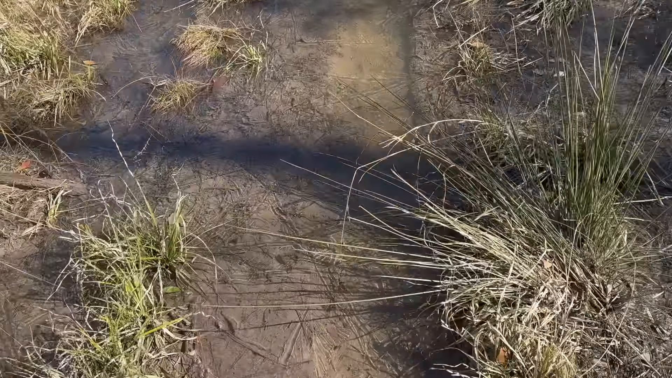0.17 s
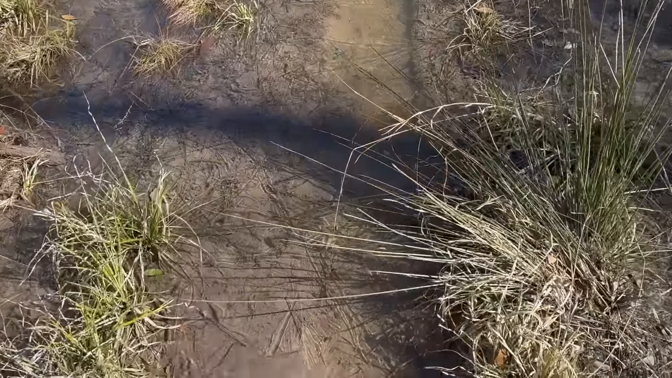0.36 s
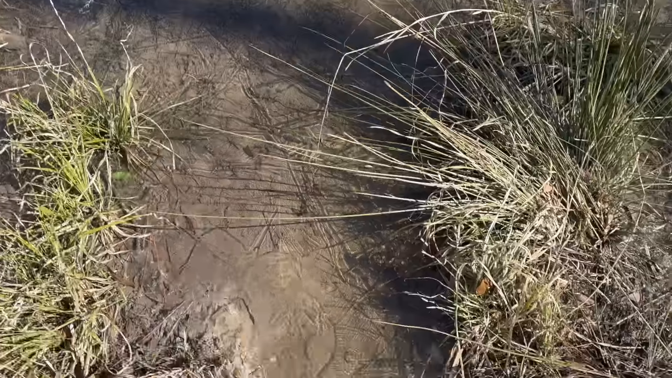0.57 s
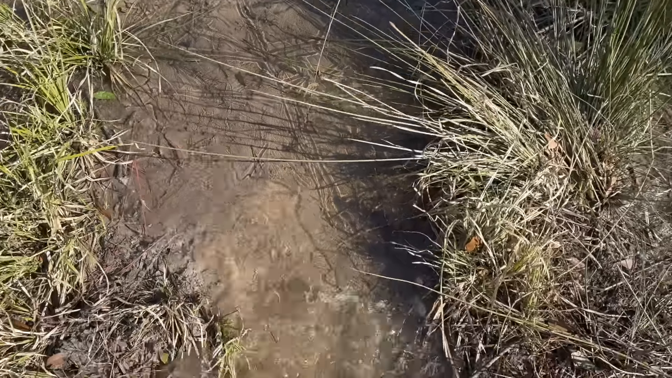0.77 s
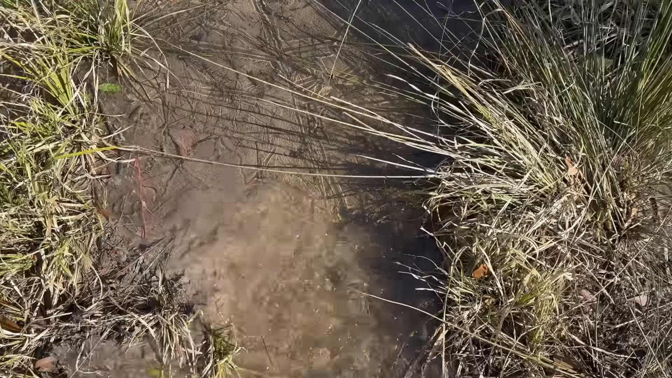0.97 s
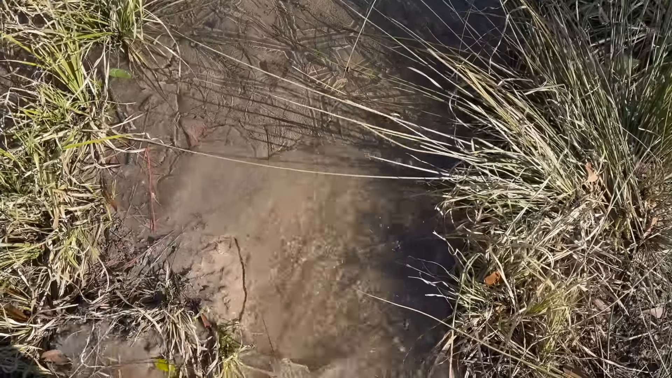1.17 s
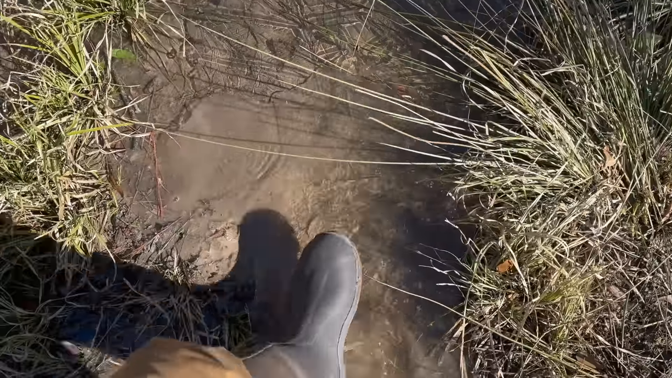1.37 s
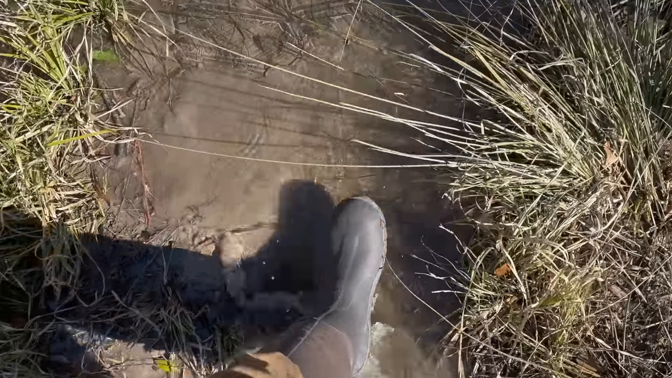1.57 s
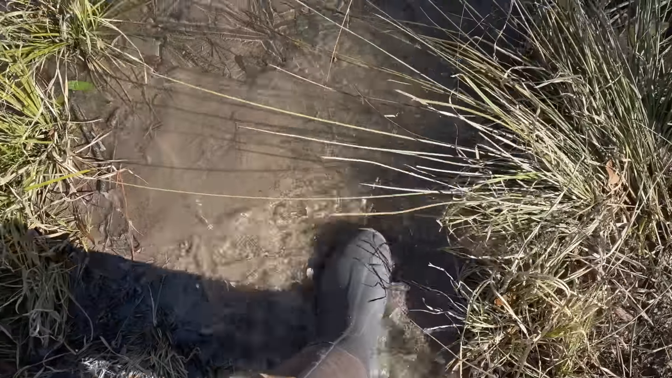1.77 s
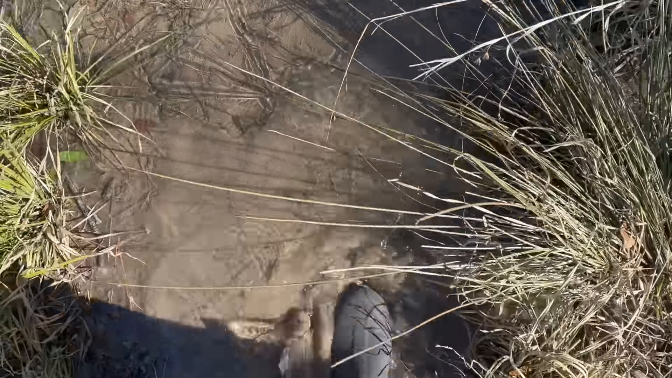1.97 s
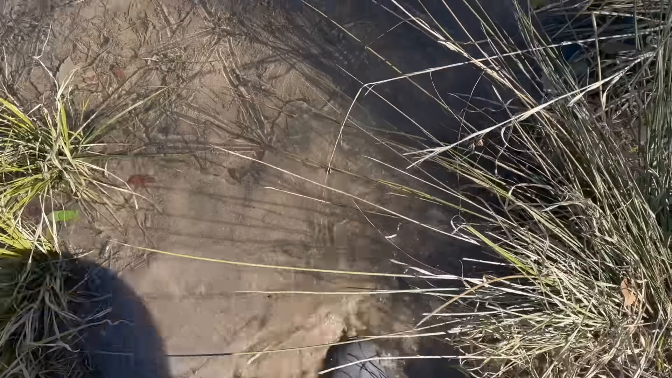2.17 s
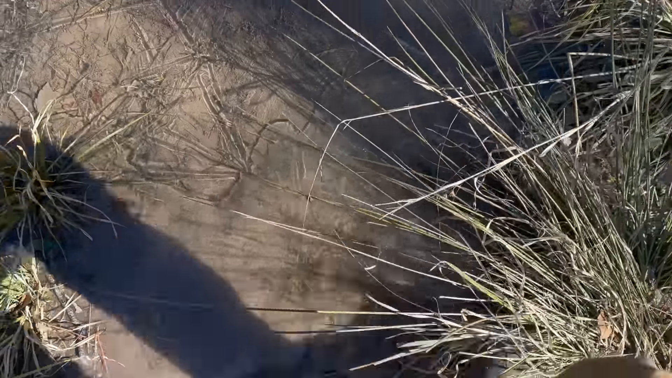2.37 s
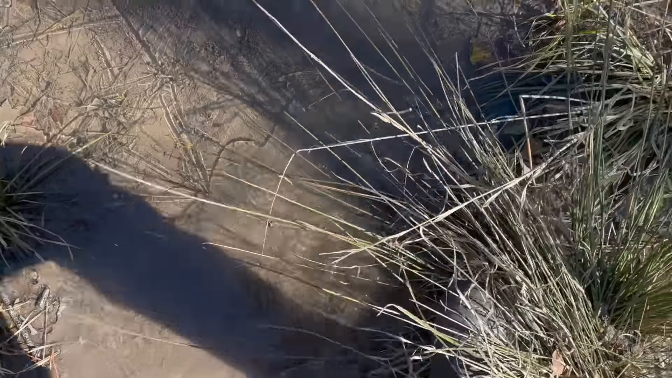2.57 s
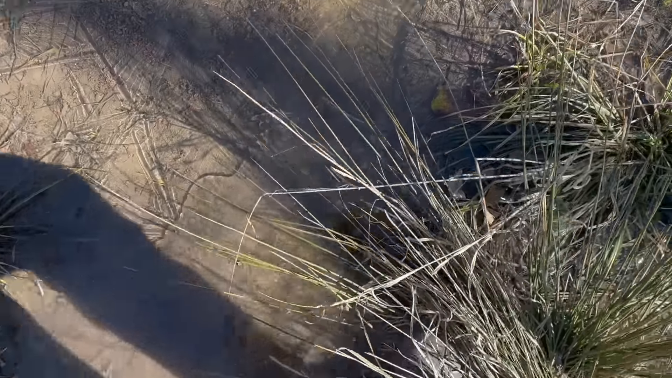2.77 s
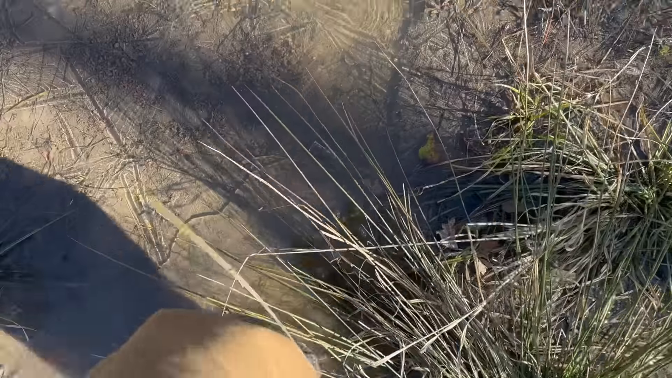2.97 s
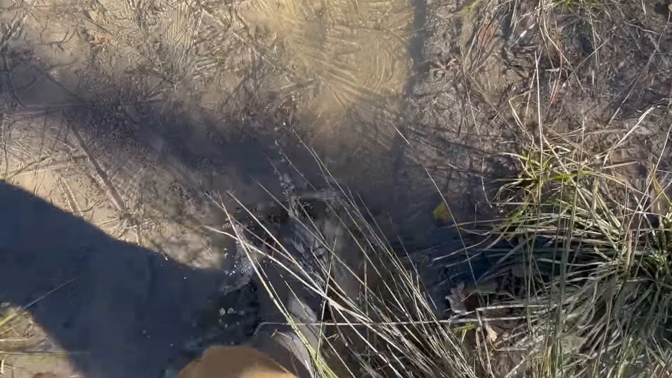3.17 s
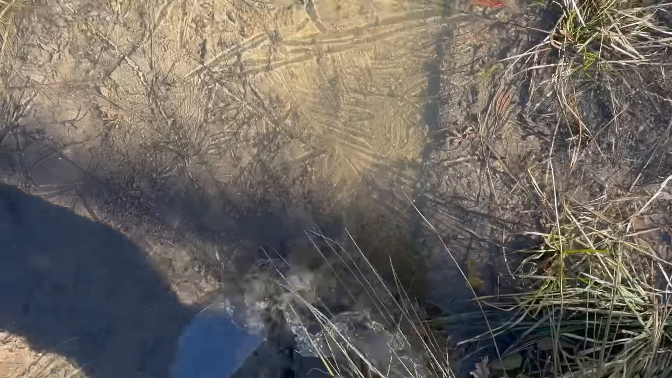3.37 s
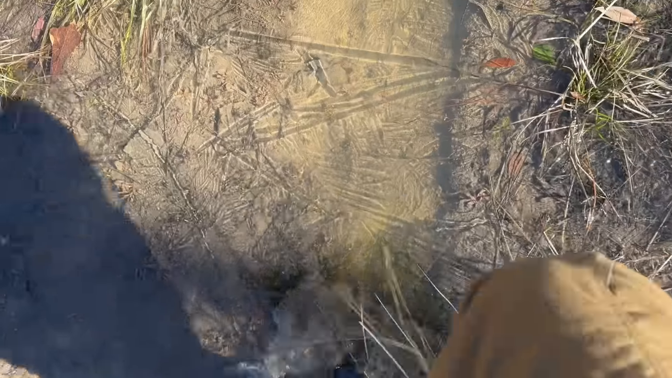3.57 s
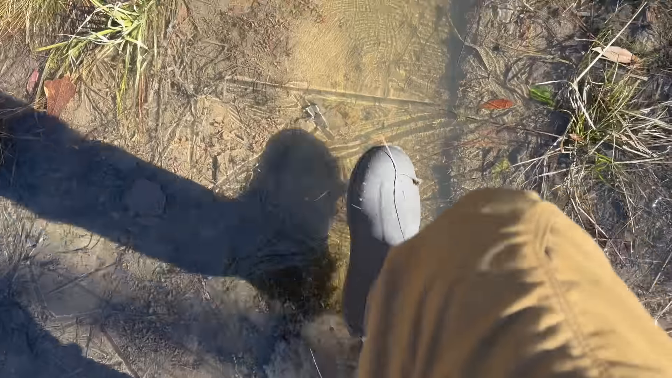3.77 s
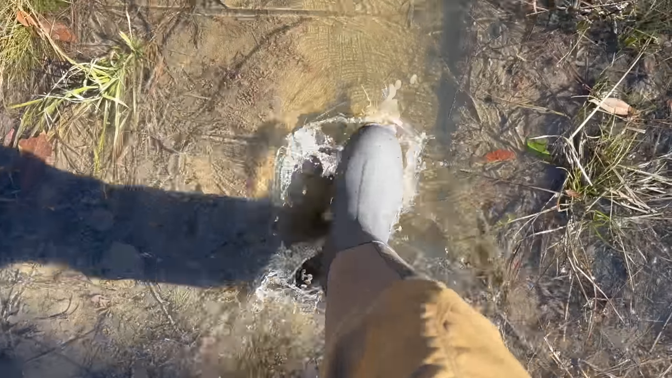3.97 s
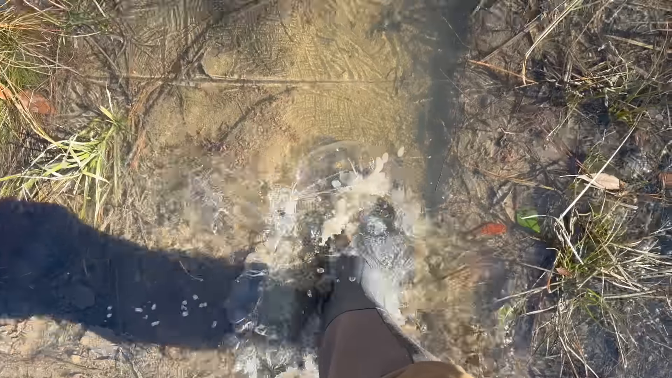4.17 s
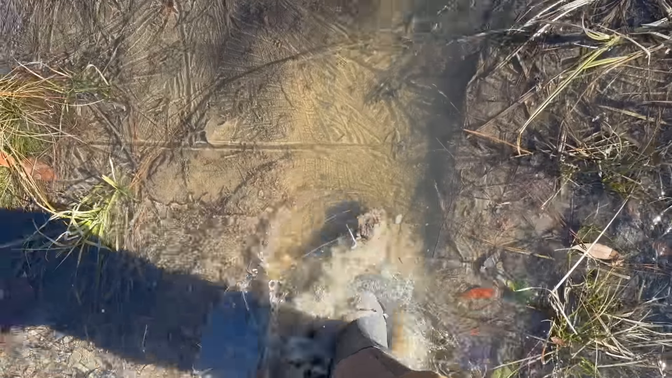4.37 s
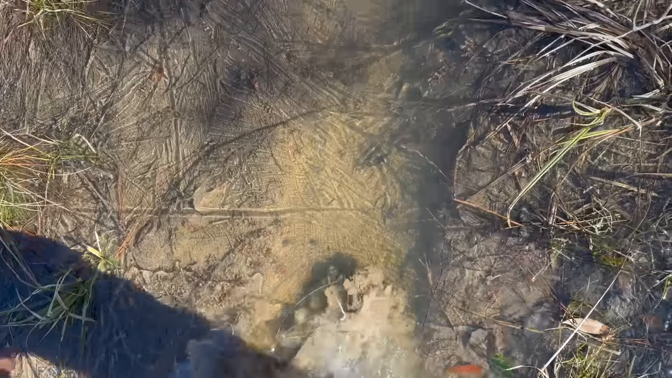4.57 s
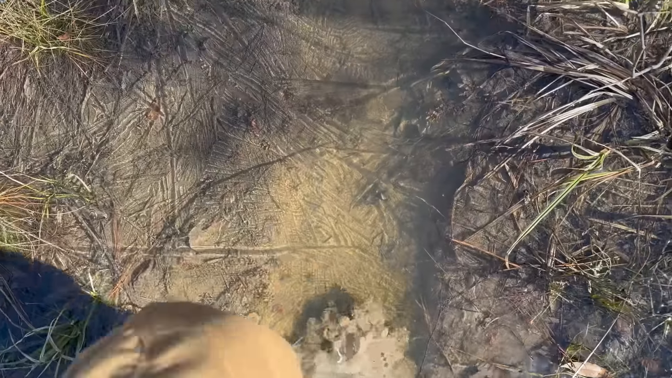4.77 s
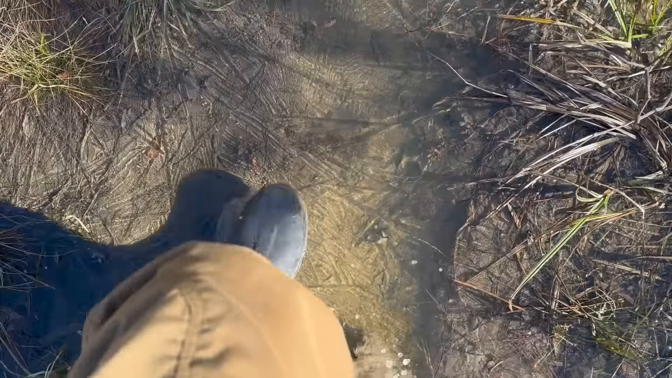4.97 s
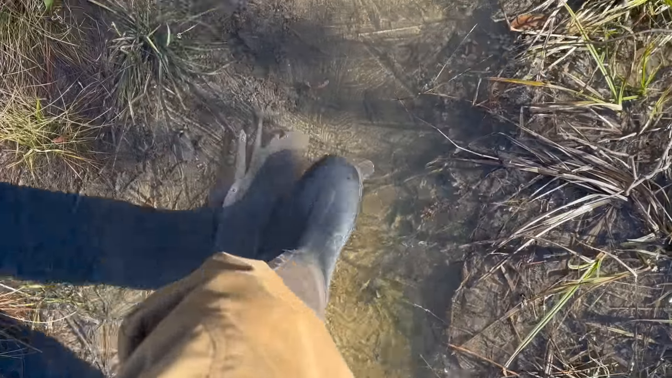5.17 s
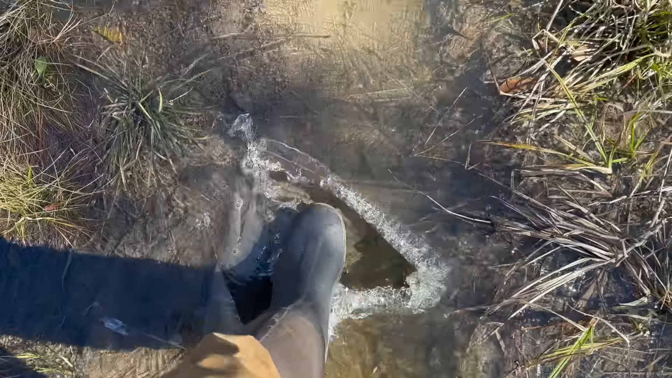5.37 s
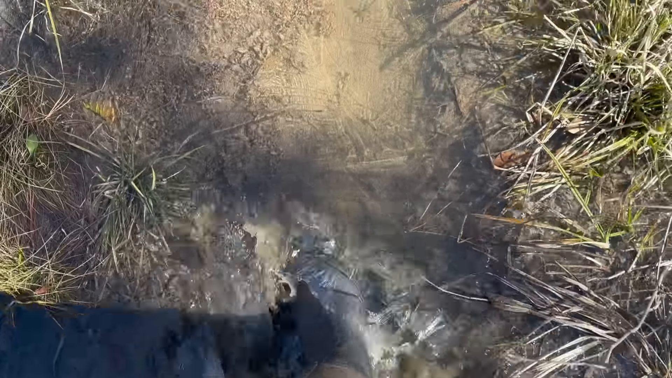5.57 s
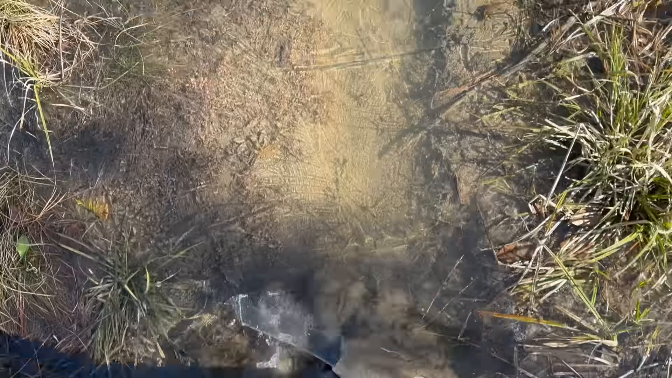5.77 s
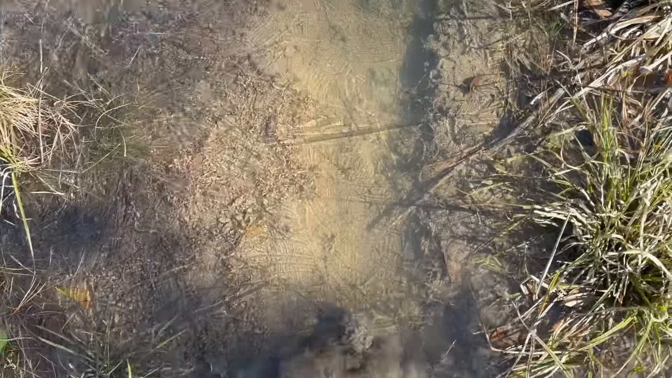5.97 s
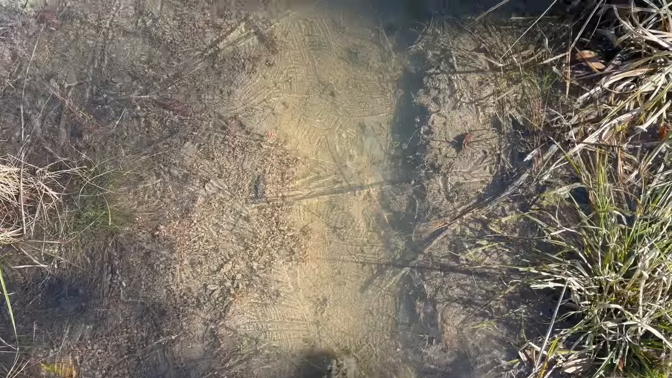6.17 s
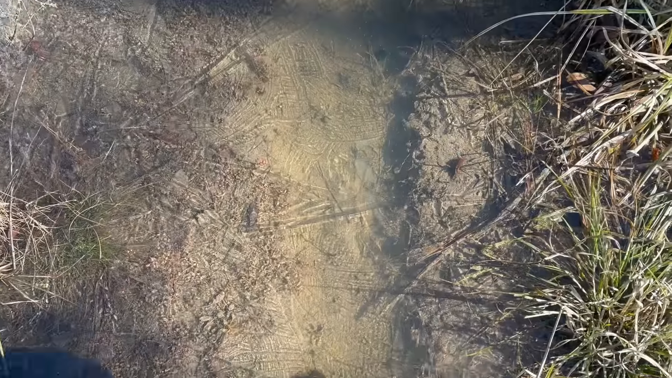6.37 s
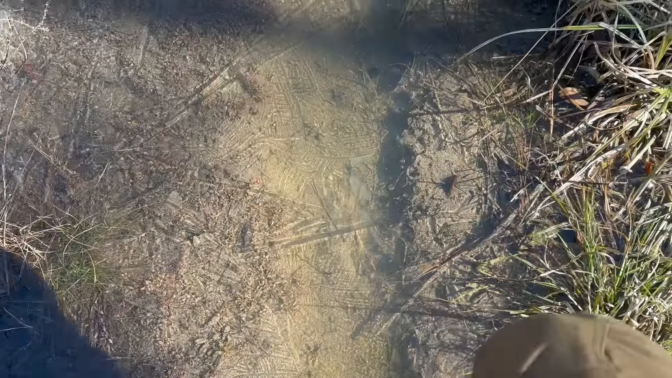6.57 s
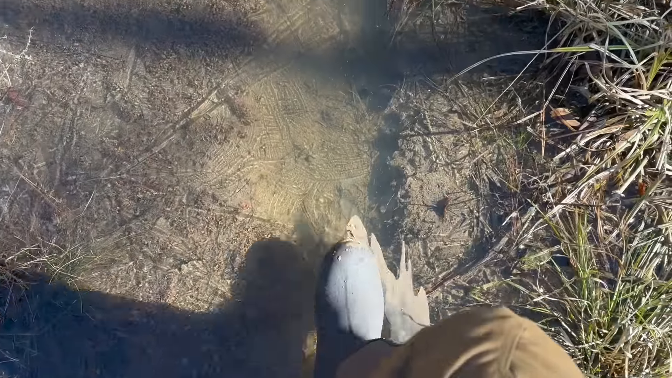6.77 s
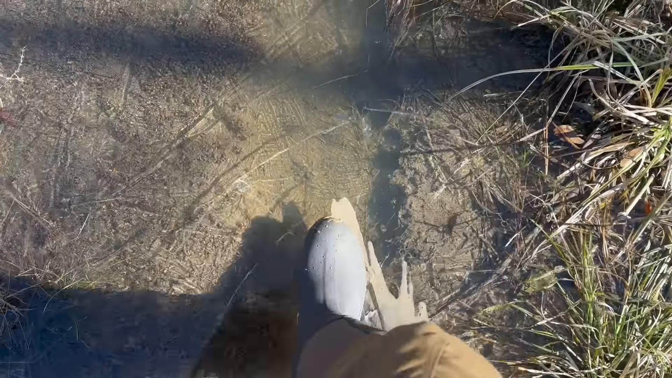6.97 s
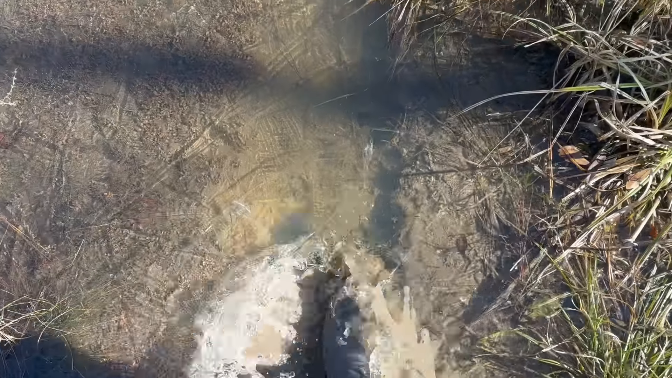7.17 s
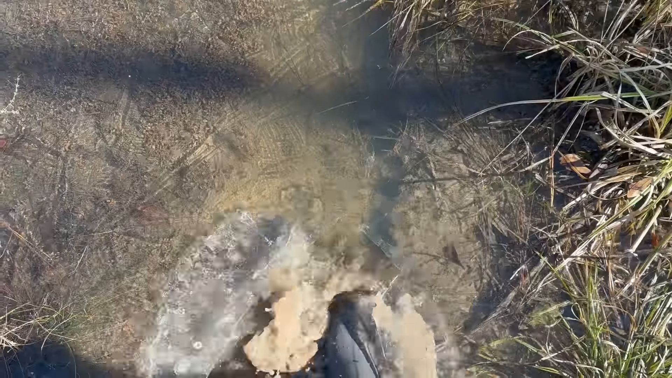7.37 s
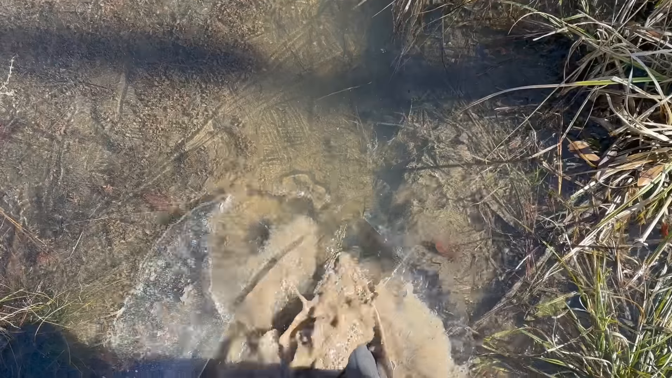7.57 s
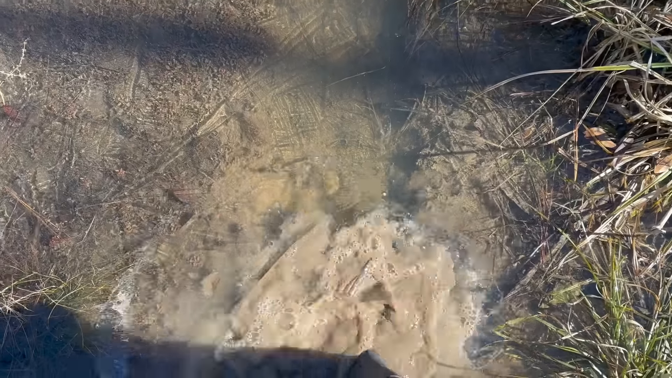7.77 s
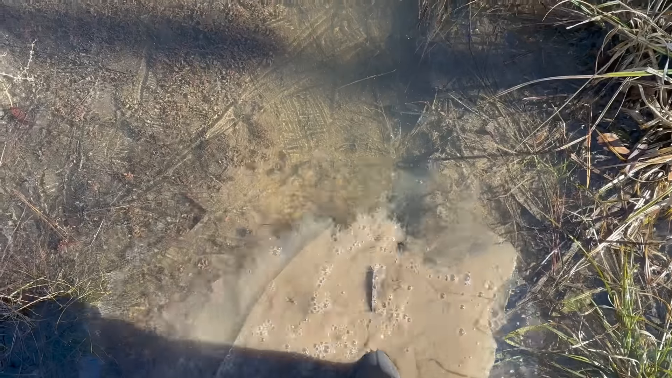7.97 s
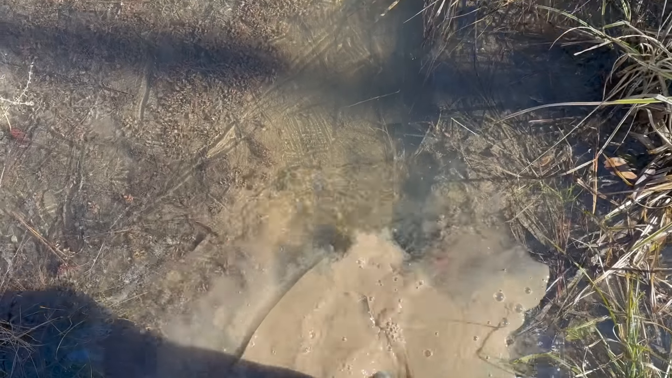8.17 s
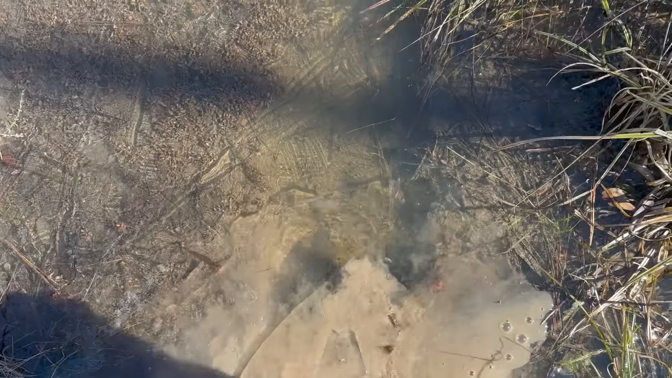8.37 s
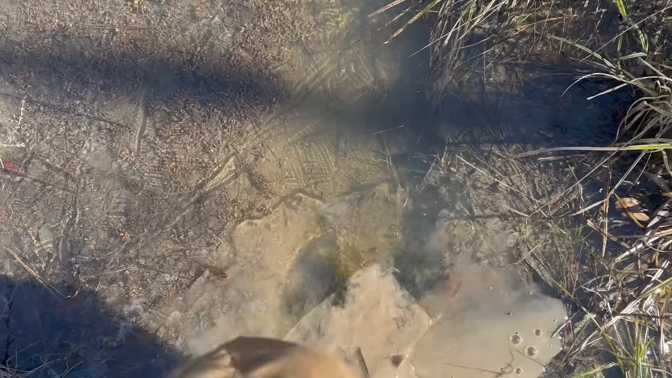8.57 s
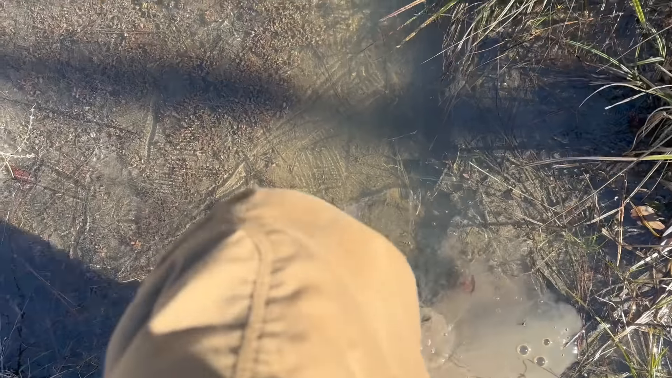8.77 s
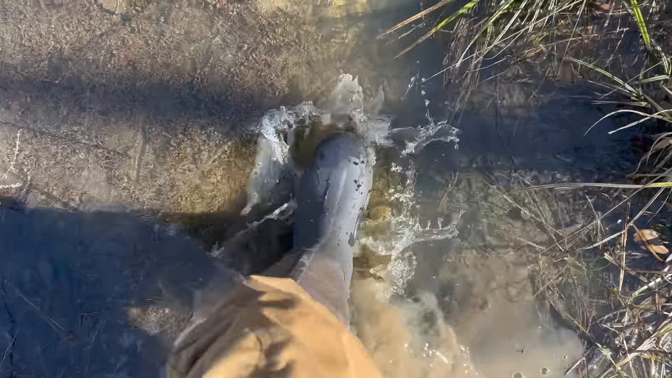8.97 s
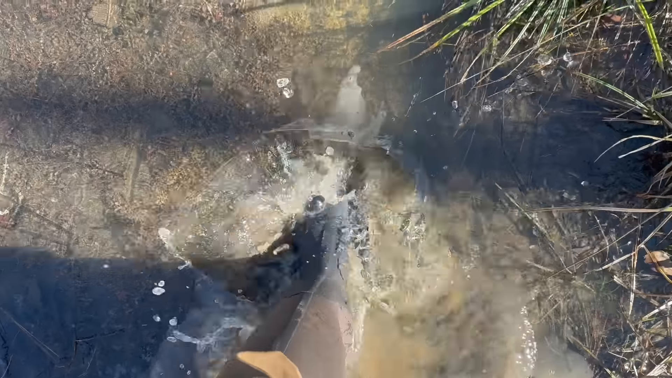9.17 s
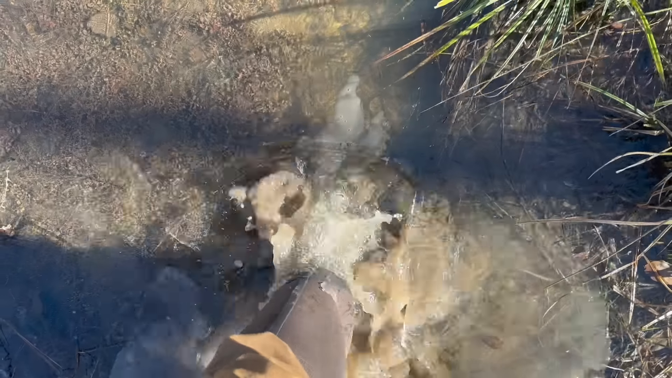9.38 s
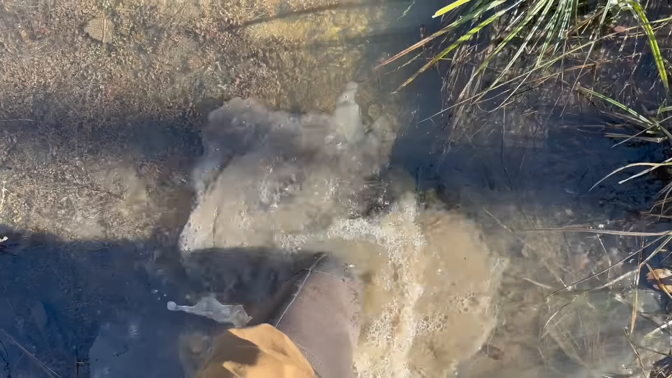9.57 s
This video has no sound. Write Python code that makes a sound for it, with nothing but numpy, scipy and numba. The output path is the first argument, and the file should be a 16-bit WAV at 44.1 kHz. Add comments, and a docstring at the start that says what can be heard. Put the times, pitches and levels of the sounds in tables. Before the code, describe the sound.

Close to a hand-held phone pointing down, rubber boots push through shallow water at an uneven walking pace. Each step brings a wet slap, a bubbling slosh and a dull thud in the mud, then trails off into drips. Low wind rumbles on the microphone at the start and around the middle. After a brief lull, one more strong splash comes near the end. A faint distant engine and soft outdoor hiss lie behind.

```python
"""A slap of water and a low gust of wind, then rubber boots wading through shallow muddy water.
Each push of a boot swells and fades, churning up bubbles, gurgles and spray; the sole thumps on the mud.
Air trapped in the water rings briefly, making the slaps and plops. Wind buffets the two microphones
of a hand-held phone that points down, and a far engine drones over a soft open-air hiss."""
import sys
import numpy as np
from scipy import signal
from scipy.fft import rfft, irfft, next_fast_len
from scipy.io import wavfile
from scipy.ndimage import uniform_filter1d
from numba import njit

SR = 44100
rng = np.random.default_rng(int(sys.argv[2]) if len(sys.argv) > 2 else 0)


def wrap_up_sound(samples):
    """Save the sound to the file named by the first command line argument, as 16-bit audio."""
    columns = np.atleast_2d(samples).T
    # keep every value between -1 and 1, then stretch to whole-number steps
    tamed = np.clip(columns, -1, 1)
    steps = np.round(tamed * 32767).astype(np.int16)
    wavfile.write(sys.argv[1], SR, steps)


N = 423801

SLOSH_HZ, SPRAY_HZ, GURGLE_HZ = (444.7, 2864), (2910, 16900), (140, 477)  # lowest and highest pitch
# Pushes of a boot through the water:
# (peak time [s], slosh level [dB], spray level [dB], gurgle level [dB], rise time [s], fade [dB/s])
BOOT_PUSHES = [(0.0, -43, -45, -43, .01, 50), (0.457, -32.5, -33.5, -32, 0.014, 49),
               (0.524, -43, -25, -48, 0.099, 270), (0.599, -27, -36, -31, 0.024, 58.5),
               (0.786, -30.5, -41, -29.5, 0.33, 106), (0.967, -29.5, -41.5, -53, 0.19, 180),
               (1.366, -30, -43, -41, 0.013, 107), (1.436, -29, -34, -31, 0.092, 306),
               (1.525, -29, -31, -35.5, 0.048, 249), (1.617, -21, -24.5, -37, 0.018, 261),
               (1.702, -40, -45, -43.5, 0.033, 17), (2.402, -40, -29, -39, 0.17, 156),
               (2.441, -31, -31, -46, 0.063, 320), (2.78, -43, -48, -45.5, 1, 27),
               (3.07, -30.5, -32.5, -32, 0.046, 36.5), (3.189, -26.5, -43, -32, 0.43, 67.5),
               (3.806, -29, -32, -32, 0.012, 43), (3.95, -19.5, -29.5, -25.5, 0.14, 163),
               (4.049, -32.5, -41, -29, 0.13, 26.5), (4.593, -32, -45, -27, 0.39, 55),
               (4.726, -24.5, -37.5, -24, 0.011, 211), (4.98, -30.5, -37, -28, 0.061, 140),
               (5.171, -29.5, -25.5, -33, 0.12, 56), (5.542, -34.5, -39, -25, 0.12, 52),
               (5.688, -30.5, -38, -37.5, 1, 37.5), (6.318, -43.5, -52, -46, 1, 30.5),
               (6.769, -30, -27.5, -36.5, 0.023, 286), (6.896, -28, -22.5, -35, 0.076, 125),
               (7.076, -23.5, -32, -27, 0.3, 33), (8.396, -38, -51.5, -32.5, 0.22, 9),
               (8.831, -29.5, -33, -27.5, 0.027, 130), (8.89, -23, -28.5, -29.5, 0.015, 31.5),
               (9.184, -26, -37.5, -22, 0.46, 245)]


def wading():
    """A boot churns the water: clouds of bubbles and drops grow louder and softer with each push."""
    slosh_db, spray_db, gurgle_db = map(push_swells, np.transpose(BOOT_PUSHES)[1:4])
    bursts_db = surges(per_s=60, fade_s=.006)
    # water that throws more spray also makes smaller, brighter bubbles
    bright_db = np.clip(spray_db - slosh_db, -20, 12)
    slosh = bubble_cloud(1300, SLOSH_HZ, cycles=19.3, rise=0.335, scatter_db=1.0,
                         tilt_db=2.27 + 0.52 * bright_db, bursts_db=0.45 * bursts_db)
    spray = bubble_cloud(14000, SPRAY_HZ, cycles=4.0, rise=0.047, scatter_db=-0.5,
                         tilt_db=0.5, bursts_db=0.51 * bursts_db)
    ticks = bubble_cloud(90, SPRAY_HZ, cycles=8.7, rise=0.19, scatter_db=3.5, tilt_db=0.0)
    gurgle = bubble_cloud(190, GURGLE_HZ, cycles=8.5, rise=0.19, scatter_db=1.5,
                          tilt_db=8.5, bursts_db=0.35 * bursts_db)
    drips = bubble_cloud(110, (650, 2000), cycles=19.0, rise=0.25, scatter_db=2.5,
                         tilt_db=0.5, bursts_db=0.59 * surges(per_s=14, fade_s=0.029))
    churn = undb(slosh_db) * slosh + undb(spray_db) * spray + undb(gurgle_db) * gurgle
    # ticks swell less than the churn, so they stand out between steps
    ticks_db = np.minimum(spray_db, -36) - 10.0
    return churn + undb(ticks_db) * ticks + undb(slosh_db - 6.5) * drips


def push_swells(peak_db, climb_db=38, still_water_db=-90):
    """Level over time in dB: each push climbs to its peak and fades; overlapping pushes add up."""
    peak_s, *_, rise_s, fade_db_per_s = np.transpose(BOOT_PUSHES)[:, :, None]
    t = np.arange(0, N + 64, 64) / SR
    before_db = climb_db * (peak_s - t) / np.maximum(rise_s, .003)
    after_db = np.abs(fade_db_per_s) * (t - peak_s)
    below_peak_db = np.where(t < peak_s, before_db, after_db)
    power = np.sum(undb(peak_db[:, None] - below_peak_db) ** 2, axis=0) + undb(still_water_db) ** 2
    return np.interp(np.arange(N) / SR, t, 10 * np.log10(power))


def sole_thuds():
    """The sole thumps dully on the mud just before each push peaks."""
    peak_s, _, _, gurgle_db, *_ = np.transpose(BOOT_PUSHES)
    detune, direction = rng.standard_normal((len(peak_s), 2)).T
    hz = 87.6 * 2 ** (.15 * detune)
    return pings(peak_s - .012, hz, undb(gurgle_db + 6), direction, cycles=7.3, rise=0.22)


# Slaps on the water: (time [s], level [dB], pitch [Hz], extra level for the crack [dB])
WATER_SLAPS = [(0.088, -9, 2100, -20.5), (0.456, -22, 1500, -3), (0.583, -6.5, 1040, -18),
               (0.963, -10, 1330, -23), (1.388, -12, 1290, -38), (1.444, -20, 1290, -4.5),
               (1.609, -26, 1180, 4.5), (2.025, -19.5, 3100, -18), (2.416, -16.5, 2030, -23),
               (3.064, -10.5, 1420, -12.5), (3.103, -13, 1180, -11), (3.938, -7.5, 1470, -11),
               (4.724, -11.5, 566, -21), (4.98, -17, 2300, -16.5), (5.068, -22, 1470, -8.5),
               (5.428, -3.5, 1400, -26), (5.682, -5.5, 1460, -23), (6.764, -20, 633, -7.5),
               (8.297, -45, 1530, 5.5), (8.68, -11, 1250, -27.5), (8.848, -13, 1390, -27),
               (8.879, -14, 1150, -9), (9.289, -28.5, 1050, 0)]


def slaps(drops=24):
    """Each slap is a ringing pocket of air, a burst of small bubbles and a crack of droplets."""
    times, db, hz, crack_db = np.transpose(WATER_SLAPS)
    direction = rng.standard_normal((len(times), 1))
    out = pings(times, hz, undb(db + 0.5), direction[:, 0], cycles=12.6, rise=.01)
    burst = (db - 10.0, SLOSH_HZ, .0024)
    crack = (db + crack_db + 6.5, SPRAY_HZ, .0011)
    for drop_db, (low_hz, high_hz), mean_delay_s in (burst, crack):
        late, pitch = np.moveaxis(rng.random((len(times), drops, 2)), 2, 0)
        starts = times[:, None] - mean_delay_s * np.log(1 - late)
        drop_hz = low_hz * (high_hz / low_hz) ** pitch
        gain = np.repeat(undb(drop_db), drops)
        drop_direction = direction + .4 * pitch
        out += pings(starts.ravel(), drop_hz.ravel(), gain, drop_direction.ravel(), cycles=6.8, rise=0.2)
    return out


# Round plops and drips: (time [s], level [dB], pitch [Hz])
WATER_PLOPS = [(0.376, -36, 1260), (0.592, -15.5, 400), (0.618, -15, 1080), (0.86, -13.5, 1270),
               (1.007, -31, 1340), (1.865, -24, 2620), (2.107, -22, 910), (2.418, -20, 480),
               (2.451, -17, 575), (2.609, -29, 454), (2.679, -25.5, 385), (3.178, -12, 1310),
               (3.607, -20, 660), (3.896, -11, 1290), (4.489, -17, 404), (4.574, -11.5, 307),
               (4.721, -6.5, 192), (4.777, -14.5, 760), (5.327, -9.5, 1500), (5.346, -12.5, 1210),
               (5.54, -12, 204), (5.637, -10, 621), (5.676, -11.5, 242), (5.779, -14, 518),
               (6.198, -22.5, 1370), (6.205, -21, 720), (6.31, -32, 1080), (6.374, -27, 343),
               (7.06, -9.5, 299), (7.081, -12.5, 387), (7.138, -12.5, 397), (7.26, -14.5, 397),
               (7.372, -20, 447), (7.905, -32, 560), (8.976, -10.5, 342), (9.144, -13, 255)]


def plops():
    """One bubble rings and climbs a little in pitch, among six quieter ones of similar size."""
    times, db, hz = np.transpose(WATER_PLOPS)
    delays, pitches = rng.random((len(times), 6, 2)).T
    direction = rng.standard_normal(len(times))
    out = pings(times, hz, undb(db), direction, cycles=13.6, rise=0.05)
    for late, pitch in zip(delays, pitches):
        nearby_hz = hz * 2 ** (pitch - .4)
        out += pings(times + .014 * late, nearby_hz, undb(db - 8.5), direction, cycles=10.0, rise=0.15)
    return out


# Single large bubbles: (time [s], level [dB], first pitch [Hz], last pitch [Hz], length [s])
LARGE_BUBBLES = [(1.904, -29.5, 689, 1790, 0.041), (4.434, -30.5, 1220, 1750, 0.013),
                 (6.557, -32, 465, 586, 0.045), (8.726, -25.5, 494, 630, 0.021)]


def large_bubbles():
    """A large pocket of air closes: its pitch climbs ever faster, then the tone breaks off."""
    out = np.zeros(N)
    for start_s, db, first_hz, last_hz, length_s in LARGE_BUBBLES:
        progress = np.linspace(0, 1, int(length_s * SR))
        hz = first_hz * (last_hz / first_hz) ** progress ** 1.6
        swell = np.sin(np.pi * progress ** 0.59) ** 0.57
        tone = np.sin(2 * np.pi * np.cumsum(hz) / SR)
        out[int(start_s * SR):][:len(tone)] += undb(db) * swell * tone
    return out


# Gusts of wind: (time [s], level [dB])
WIND_GUSTS = [(0.12, -28), (0.65, -27), (1.3, -54.5), (3.72, -40.5), (4.29, -21), (4.5, -80), (5.32, -66),
              (5.38, -23.5), (5.75, -41.5), (8.88, -58)]


def wind():
    """Wind buffets the microphones with a low, unsteady rumble, mostly the same in both."""
    shared, side = noise_pair(hz=[25, 55, 90, 200, 400], db=[-45, 8.0, 6.0, -8.0, -59.0])
    rumble = np.array([shared + 0.28 * side, shared - 0.28 * side])
    flutter = undb(2.5 * wobble(step_samples=3000))
    return set_level(rumble * flutter, 0) * gain_curve(WIND_GUSTS)


# Loudness of the far engine: (time [s], level [dB])
ENGINE_LEVELS = [(1.1, -49), (2.25, -53.5), (2.5, -41), (3.0, -43), (3.3, -75), (7.3, -58), (7.55, -41.5),
                 (8.05, -47), (9.61, -49.5)]


def far_engine(start_hz=155.4, sink_hz_per_s=1.6):
    """A far engine hums one low tone that sinks steadily in pitch."""
    t = np.arange(N) / SR
    tone = np.sin(2 * np.pi * (start_hz - sink_hz_per_s * t / 2) * t)
    return np.sqrt(2) * gain_curve(ENGINE_LEVELS) * tone


# Tone of the open air, from bass to treble: (frequency [Hz], relative level [dB])
AIR_TONE = [(139, 6.5), (557, -4.5), (1440, -34.5), (16000, -27.5)]


def open_air():
    """A soft, steady hiss, a little different on the left and right."""
    shared, side = noise_pair(*np.transpose(AIR_TONE))
    return set_level(np.array([shared + .5 * side, shared - .5 * side]), db=-49.5)


def bubble_cloud(per_s, range_hz, cycles, rise, scatter_db, tilt_db, bursts_db=0):
    """Bubbles ring at random. scatter_db varies their loudness; tilt_db is the boost per octave up."""
    count = int(per_s * N / SR)
    when, pitch, strength, length = rng.random((count, 4)).T
    start = (when * N).astype(int)
    octaves = (pitch - .5) * np.log2(range_hz[1] / range_hz[0])
    hz = np.sqrt(range_hz[0] * range_hz[1]) * 2 ** octaves
    tilt, burst = (np.broadcast_to(db, N)[start] for db in (tilt_db, bursts_db))
    gain = undb(-scatter_db * np.log(1 - .99 * strength) + tilt * octaves + burst)
    ring_cycles = cycles * (0.22 + 2.13 * length ** 2)
    direction = rng.standard_normal(count)
    return set_level(pings(start / SR, hz, gain, direction, ring_cycles, rise * length), 0)


def pings(times, hz, gain, direction, cycles, rise):
    """Short ringing tones. Direction sets the delay between the microphones, less so in the treble."""
    lag_s = (-6.2e-5 + 6e-5 * direction) * np.minimum(1, 4380 / hz) ** 2
    start = (np.clip(times, 0, None) * SR).astype(np.int64)
    each = np.ones(len(times))
    return ring(start, hz, np.maximum(cycles, 1) * each, rise * each, gain, lag_s * SR)


@njit
def ring(start, hz, cycles, rise, gain, lag_samples):
    """Each tone starts softly, dies away and slides up in pitch (a rise of 0.2 means 20% higher)."""
    out = np.zeros((2, N))
    for k in range(len(start)):
        length = int(cycles[k] * SR / hz[k]) + 2
        step = 2 * np.pi * hz[k] / SR
        phase, height, muted = 0., gain[k], 1.
        fade, unmute = np.exp(-5 / length), np.exp(-40 / length)
        glide = (1 + rise[k]) ** (1 / length)
        for i in range(start[k], min(start[k] + length, N)):
            muted *= unmute
            out[0, i] += height * (1 - muted) * np.sin(phase - lag_samples[k] * step)
            out[1, i] += height * (1 - muted) * np.sin(phase)
            phase += step
            height *= fade
            step = min(step * glide, 2.8)
    return out


def surges(per_s, fade_s):
    """Sudden random splashes that each die away, in dB around their average."""
    kicks = rng.exponential(size=N) * (rng.random(N) < per_s / SR)
    fading = signal.lfilter([1], [1, -np.exp(-1 / (fade_s * SR))], kicks)
    db = 20 * np.log10(fading + 0.15)
    return db - db.mean()


def wobble(step_samples):
    """A value that slides from one random number to the next."""
    steps = np.repeat(rng.standard_normal(N // step_samples + 1), step_samples)
    return uniform_filter1d(steps, step_samples)[:N]


def noise_pair(hz, db):
    """Two separate noises, both shaped to the given level at each frequency."""
    f = np.fft.rfftfreq(N, 1 / SR)
    shape = undb(np.interp(np.log(f + 1), np.log(hz), db))
    return irfft(rfft(rng.standard_normal((2, N))) * shape, N)


def gain_curve(table):
    """Join (time, level) points into one gain per sample."""
    return undb(np.interp(np.arange(N) / SR, *np.transpose(table)))


def set_level(x, db):
    """Scale a sound to an average (rms) level."""
    return x * undb(db) / np.sqrt(np.mean(x ** 2))


def undb(db):
    """Turn decibels into a gain, the number to multiply a sound by."""
    return 10 ** (np.asarray(db) / 20)


def scene():
    """Boots and water, with wind, engine and open air behind them, in stereo."""
    water = wading() + sole_thuds() + slaps() + plops() + large_bubbles()
    return water + wind() + far_engine() + open_air()


# How the phone boosts or cuts each frequency: (frequency [Hz], gain [dB])
PHONE_TONE = [(35, -73), (56.4, -9), (424, -2.5), (727, -5.5), (1373, 3), (2290, 4), (4540, 0), (9700, 5),
              (10740, -18.5), (12300, -19.5), (12560, 1.5), (16000, 4), (16150, -65)]
# How much louder the left microphone is: (frequency [Hz], left minus right [dB])
MIC_BALANCE = [(150, 0.5), (424, -2), (727, -7.5), (1500, -6), (4540, 1.5), (12000, -1)]


def record(dry, late_cycles=1.4, top_hz=16995):
    """The phone colours the sound, delays the bass, rounds off loud peaks and cuts the highest treble."""
    size = next_fast_len(N + SR // 4)
    f = np.fft.rfftfreq(size, 1 / SR) + 30
    tone_db, balance_db = (np.interp(np.log(f), np.log(hz), db)
                           for hz, db in map(np.transpose, (PHONE_TONE, MIC_BALANCE)))
    gain = np.array([undb(tone_db + side * balance_db / 2) for side in (1, -1)])
    # low pitches arrive later than high ones, so clicks sweep downward
    smear = np.exp(-2j * np.pi * late_cycles * (np.log(f / SR) - f / 8000))
    coloured = irfft(rfft(dry, size) * gain * smear, size)[:, :N]
    rounded = np.tanh(coloured / 1.34) * 1.48
    return signal.sosfilt(signal.ellip(10, .2, 70, top_hz, fs=SR, output="sos"), rounded)


dry = scene()
out = record(dry)
wrap_up_sound(out)
```